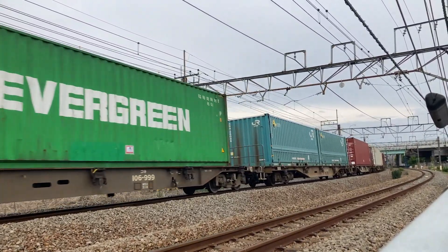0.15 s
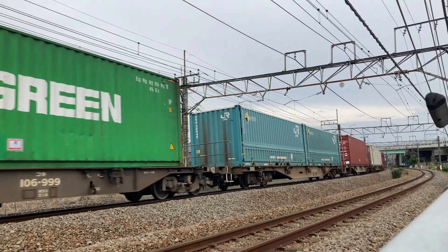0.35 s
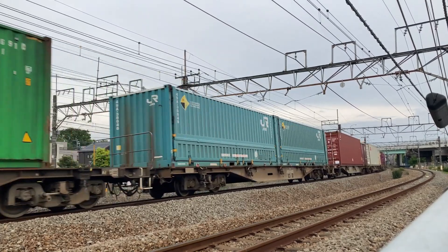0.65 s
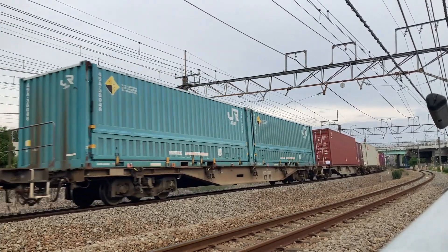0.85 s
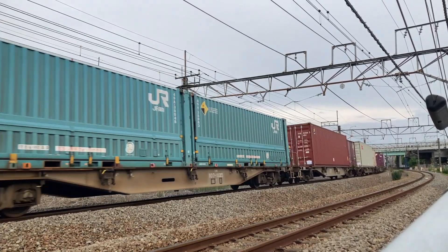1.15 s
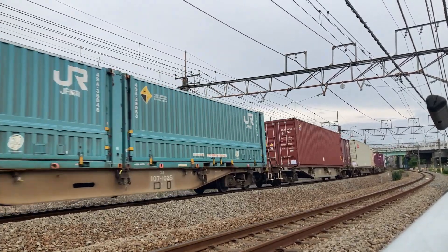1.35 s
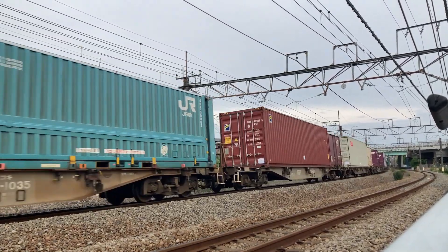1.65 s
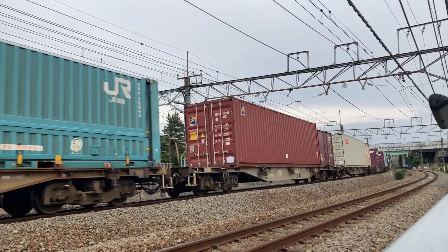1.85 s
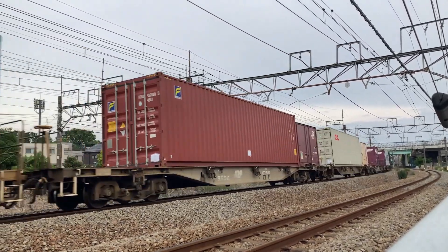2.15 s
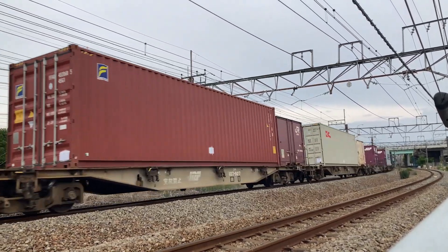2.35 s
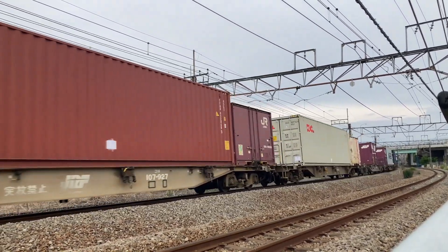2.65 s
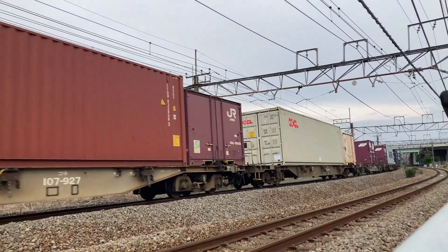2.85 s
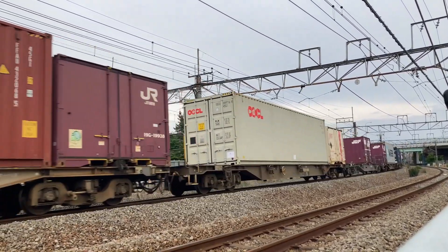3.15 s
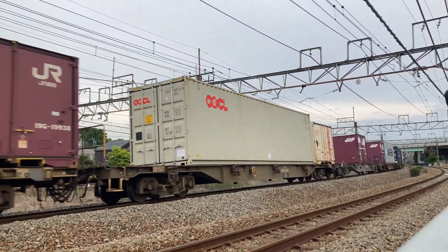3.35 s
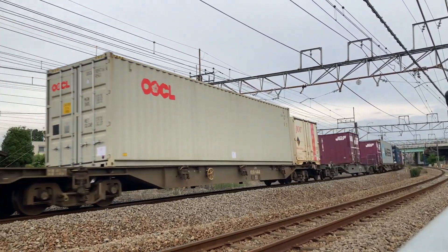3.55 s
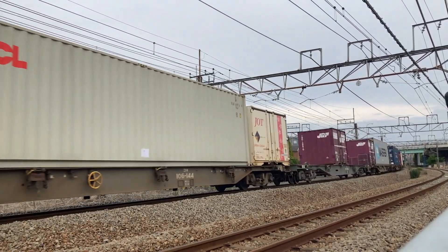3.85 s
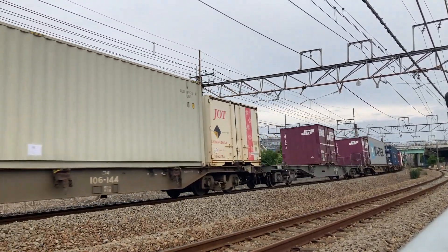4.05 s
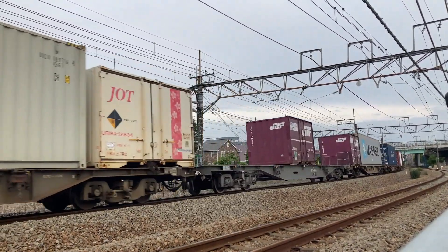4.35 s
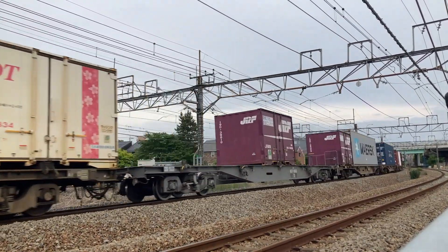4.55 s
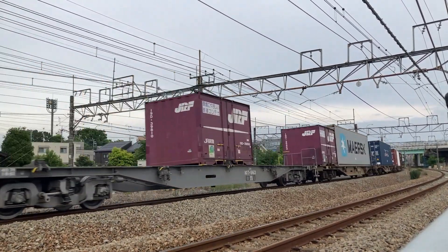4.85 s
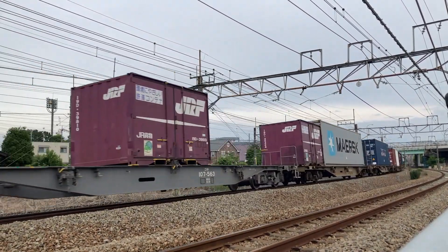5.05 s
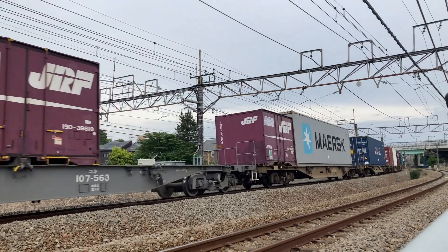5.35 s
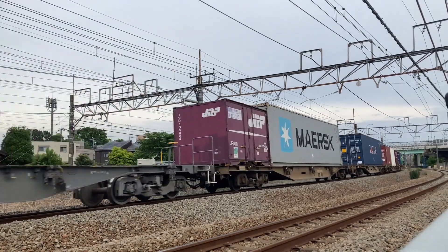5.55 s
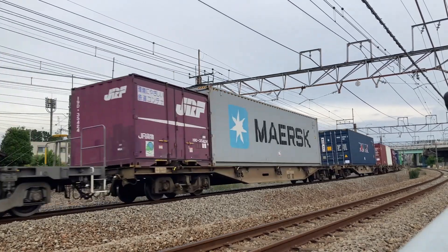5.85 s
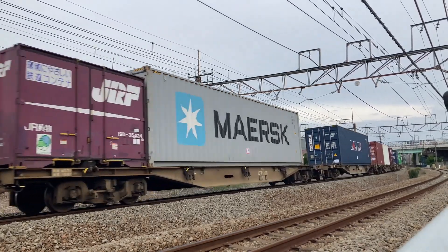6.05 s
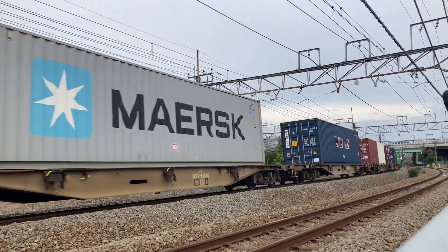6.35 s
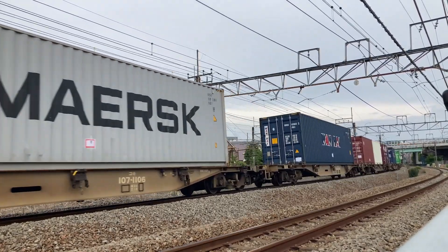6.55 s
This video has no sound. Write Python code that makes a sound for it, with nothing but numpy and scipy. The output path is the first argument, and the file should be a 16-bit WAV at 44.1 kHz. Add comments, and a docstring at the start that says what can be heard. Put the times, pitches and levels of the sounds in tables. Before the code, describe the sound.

A container freight train rolls close by on a curve, wheels hissing and squealing thin and high over paired metallic clacks and a low rumble.

```python
"""Freight train on a curve

Wheel flanges rub the rail: a bright hiss, and wheel modes under stick-slip that squeal and slide down in pitch
as each wheel goes by. Axles clack, mostly in pairs, over a rail joint; rail resonances hum under rough wheels;
the cars rumble and bump as low noise and short swings. Two spaced microphones; both trebles come from the left.
"""
import sys
import numpy as np
from scipy import signal
from scipy.fft import rfft, irfft
from scipy.io import wavfile
from scipy.ndimage import uniform_filter1d

SR = 44100
rng = np.random.default_rng(int(sys.argv[2]) if len(sys.argv) > 2 else 0)


def to_wav(s):
    """Save 16-bit WAV."""
    ch = np.atleast_2d(s).T  # columns
    pcm = np.round(np.clip(ch, -1, 1) * 32767)  # PCM
    wavfile.write(sys.argv[1], SR, pcm.astype(np.int16))


N = 295470
TIME = np.arange(N) / SR
HZ = np.maximum(np.arange(N // 2 + 1) * SR / N, 1)

# squeal bursts, one wheel mode each: [rest pitch f/Hz, wheel nearest t/s, loudest t/s, rise t/s, fall t/s, level/dB]
SQUEAL_BURSTS = [ (6681, 0.84, .02, .05, 0.56, -41), (10308, 0.16, 0.052, 0.077, .07, -37),
                 (11152, 2.5, 0.28, 0.74, .5, -38), (12200, 2, .32, .04, .09, -38),
                 (9098, 1.8, 0.62, 0.22, 0.22, -38), (6320, 0.7, .55, .13, 0.17, -35.5),
                 (8560, 0.8, .62, .2, 0.51, -33.5), (12600, 1.12, .66, .2, .14, -35),
                 (6660, 0.84, .72, .08, 0.15, -32.5), (12400, 0.9, 0.745, .04, 0.081, -24.5),
                 (4600, 0.85, .84, .07, .14, -40), (6900, 3.5, .86, .2, .16, -38.5),
                 (12275, 0.9, .92, .09, .1, -24.5), (4860, 1.02, .95, .35, .3, -41),
                 (5790, 1.26, .96, .03, .12, -34), (4230, .9, .88, .1, .05, -40),
                 (9901, 2.08, 1.1, .15, .5, -41), (9098, 1.32, 1.22, .17, .37, -37),
                 (4916, 1.46, 1.23, .03, .12, -27), (4916, 1.46, 1.34, .1, .11, -32),
                 (6960, 4, 1.3, .1, 0.36, -37), (10800, 1.58, 1.3, .2, 0.39, -37.5),
                 (10970, 2.5, 1.3, 0.66, 0.85, -40.5), (4916, 1.46, 1.56, .1, .1, -42),
                 (4870, 1.6, 1.72, .07, .18, -41), (9080, 2.5, 1.6, 0.15, 0.18, -33.5),
                 (6955, 3.9, 1.97, .1, 0.036, -26.5), (7400, -0.7, 1.97, 0.28, .2, -32.5),
                 (14550, 2.53, 2.15, .4, .2, -31), (5280, 2.5, 2.18, 0.05, 0.04, -35),
                 (14230, 2.15, 2.22, .14, 0.05, -31), (10950, 2.3, 2.25, .2, 0.35, -38),
                 (6947, 3.5, 2.2, .17, 0.28, -41.5), (4865, 2.5, 2.42, 0.4, 0.3, -39),
                 (14550, 2.53, 2.38, 0.07, .06, -27), (13628, 2, 2.55, .04, .1, -33),
                 (14550, 2.53, 2.5, .06, .08, -29), (13483, 2.54, 2.6, 0.17, .12, -34),
                 (14530, 2.53, 2.62, .05, 0.06, -21), (14470, 1.5, 2.4, .08, .12, -31),
                 (13678, 5.3, 3.0, .2, .9, -42), (8860, 6, 4.1, 0.044, 0.14, -33),
                 (2940, 3.5, 3.4, .06, .09, -44), (6160, 3.55, 3.475, .05, 0.13, -28),
                 (6070, 3.55, 3.56, 0.09, 0.05, -30), (7150, 3.5, 3.45, .25, .15, -37),
                 (2940, 3.7, 3.74, .05, .07, -39), (4040, 3.5, 3.42, .05, .08, -41),
                 (4580, 3.9, 3.8, .08, .08, -43), (2640, 3.95, 3.95, .06, .05, -44),
                 (4930, 4, 3.71, .06, 0.05, -36), (8160, 3.5, 3.72, .4, .12, -40),
                 (6947, 3.9, 3.76, .2, 0.12, -36), (3990, 3.7, 3.77, .06, .1, -35),
                 (3930, 3.9, 3.98, .07, .04, -41), (2040, 3.8, 3.78, 0.12, 0.2, -44),
                 (2200, 3.8, 3.74, .1, .15, -46), (2130, 3.9, 3.9, .12, .1, -47),
                 (3930, 3.9, 3.84, .1, .15, -43), (8940, 4.5, 4.4, .065, .12, -36),
                 (3800, 4.5, 4.33, 0.091, 0.09, -40), (9000, 5.5, 4.32, 0.51, 0.76, -40.5),
                 (10950, 4.65, 4.25, 0.4, 0.3, -37), (10950, 4.65, 4.7, .16, .12, -27),
                 (5130, 4.9, 4.54, .08, .16, -37), (5100, 4.6, 4.33, .06, .08, -41),
                 (2590, 4.85, 4.8, .1, .12, -47), (12500, 4.8, 4.7, 0.12, .11, -40),
                 (15379, 4.5, 4.7, .07, .13, -37), (14100, 5.04, 4.7, 0.06, .09, -28),
                 (4030, 4.6, 4.67, .09, .1, -35), (4442, 4.88, 4.63, .06, .06, -33),
                 (4460, 4.88, 4.78, .08, .07, -34), (10500, 5, 4.4, .06, .22, -36),
                 (3840, 5.1, 5.02, .07, .07, -42), (3930, 5.2, 5.2, .15, .35, -42),
                 (3950, 4.8, 4.8, .15, .2, -40), (6800, 6.5, 5.96, .06, .12, -37),
                 (9848, 5, 5.75, .45, 0.23, -34.5), (7070, 6.5, 5.9, .9, 0.5, -38),
                 (9848, 5, 5.98, .07, 0.12, -25), (13038, 8, 6.9, .5, .3, -40),
                 (9848, 4.5, 6.14, .06, .02, -28), (9780, 4.98, 6.2, .42, 0.22, -31),
                 (14318, 5, 6.3, .15, .3, -38), (7130, 6.5, 6.31, 0.16, 0.061, -24),
                 (6380, 6.76, 6.32, .13, .13, -37), (13038, 6.44, 6.34, .12, 0.45, -33),
                 (9710, 5.5, 6.375, .06, .015, -27), (15282, 6.6, 6.4, .2, .17, -34),
                 (14318, 6, 6.42, .03, .055, -19), (14500, 6.4, 6.42, .2, .05, -30),
                 (7150, 6.5, 6.48, 0.14, .08, -28.5), (7795, 3.5, 6.4, 0.2, 0.3, -32),
                 (9710, 5, 6.5, 0.056, .12, -31), (14303, 7.28, 6.62, .17, .2, -36),
                 (7130, 6.5, 6.66, 0.13, .1, -35), (9880, 5, 6.68, .3, .1, -27.5)]
# level of one wheel that sings through its whole passing: [t/s, level/dB]
LONG_SQUEAL_LEVEL = [(1.44, -42), (2.16, -36), (2.46, -33), (2.619, -27.5), (2.76, -28.5), (2.81, -17.5),
                     (2.88, -32), (2.98, -30.5), (3.14, -22), (3.24, -29), (3.32, -27), (3.4, -14.5),
                     (3.46, -31.5), (3.52, -19.5), (3.58, -30), (3.74, -29), (3.92, -39), (4.05, -46)]
# random share of a squeal's grip, by pitch; low modes fray more: [f/Hz, share 0-1]
SQUEAL_ROUGHNESS = [(2000, 1), (4000, 0.2), (5000, 0.2), (11000, 0.5)]
# hiss around a tone, by pitch: [f/Hz, relative level/dB]
SQUEAL_HALO = [(5000, -8), (9000, -5.5)]
# faint squeals, by pitch: [f/Hz, relative level/dB]
FAINT_LEVEL = [(1900, -21), (3000, -13), (4500, -10), (7000, -3), (11000, 1), (15600, -2.5)]
# flange contact: [t/s, hiss level/dB, scrape level/dB]
FLANGE_LEVELS = [(0.0, -24, -45), (0.32, -33, -42.5), (0.5, -26, -39.5), (0.97, -23.5, -38),
                 (1.31, -25.5, -39), (1.57, -34, -36.5), (1.79, -26, -39), (2.39, -28.5, -36.5),
                 (2.67, -27.5, -43), (3.04, -30, -37.5), (3.4, -28.5, -39), (3.86, -24, -35),
                 (4.1, -31.5, -40), (4.58, -24, -32), (5.2, -31.5, -38), (5.67, -29.5, -39.5),
                 (6.05, -22.5, -36.5), (6.34, -25.5, -39), (6.7, -27, -37.5)]
# flange hiss spectrum: [f/Hz, relative density/dB per Hz]
HISS_SPECTRUM = [(4500, -20.5), (6000, -14), (7200, -2), (8200, -12.5), (10000, -1.5), (11500, -2.5),
                 (13000, -6), (14500, -1), (15200, -10.5), (16000, 3)]
# flange scrape spectrum: [f/Hz, relative density/dB per Hz]
SCRAPE_SPECTRUM = [(2400, -39), (3200, -5), (4000, 0), (4500, -1.5), (5500, 2), (6300, -14.5), (7000, -4),
                   (9000, -2)]
# tread grind: [t/s, level/dB]
TREAD_LEVEL = [(0, -47.5), (.8, -48), (1.7, -47.5), (2.4, -46), (3.4, -47), (3.82, -40), (4.02, -46),
               (4.3, -43.5), (5.08, -44.5), (5.4, -48.5), (5.86, -50.5), (6.05, -49), (6.34, -40),
               (6.7, -48)]
# tread grind spectrum: [f/Hz, relative density/dB per Hz]
GRIND_SPECTRUM = [(1100, -28.5), (1650, -13), (1950, 0.5), (2200, -1.5), (2600, -2), (3000, -5.5),
                  (3500, -8.5), (4500, -76)]
# axles over the joint: [t/s, relative level/dB, pitch that rings most f/Hz, relative thud level/dB]
AXLE_CLACKS = [(0.437, -32, 614, 3), (0.553, -34.5, 560, -1), (0.81, -25.5, 510, 1),
               (0.934, -29.5, 760, -0.5), (1.684, -29, 540, -2), (1.81, -33, 950, 10),
               (2.061, -33.5, 616, 0), (2.194, -29.5, 526, 0), (2.944, -30, 553, 0),
               (3.072, -33.5, 524, -9), (3.333, -28, 530, -14), (3.446, -30.5, 590, -18),
               (4.218, -31, 554, 5), (4.334, -35, 630, -2.5), (4.601, -31, 560, 5), (4.729, -34, 656, 7),
               (5.486, -31.5, 690, 6), (5.619, -31.5, 620, -8), (5.832, -35, 500, 3), (5.877, -27, 560, 2),
               (5.976, -31.5, 527, 16), (6.013, -30, 860, 5), (6.128, -31, 850, -8), (6.286, -35, 654, 2),
               (6.432, -33.5, 800, 12), (6.593, -34, 607, 10)]
# joint modes: [f/Hz, relative level/dB, t60/s]
JOINT_MODES = [(102, -10, 0.03), (249.3, -14, 0.06), (335, -14, 0.04), (420.4, -10, 0.1), (505, 2, 0.12),
               (620, 2, 0.035), (760, 0, 0.03), (930, -5, 0.06), (1150, -12, 0.036), (1330, -12, 0.08)]
# rail and sleeper resonances: [f/Hz, -6 dB width f/Hz, relative level/dB]
RAIL_RESONANCES = [(436, 24, 3), (454, 158, -5.5), (877.5, 61, -2), (1325, 27.5, -6), (1760, 650, -17)]
# rolling noise spectrum: [f/Hz, relative density/dB per Hz]
ROLLING_SPECTRUM = [(150, -17.5), (300, -12), (600, -3), (1000, -5.5), (1500, -12.5), (2500, -73)]
# car body rumble: [t/s, level/dB]
CAR_LEVEL = [(0, -40), (.4, -48), (1.0, -44.5), (1.3, -41), (2.0, -44), (2.5, -46.5), (3.5, -44),
             (4.4, -45.5), (5.2, -46.5), (6.05, -43), (6.7, -42)]
# car body rumble spectrum: [f/Hz, relative density/dB per Hz]
RUMBLE_SPECTRUM = [(15, -50), (25, -46), (35, -10), (55, 2.5), (90, -0.5), (150, -6), (250, -10),
                   (320, -16.5), (400, -22)]
# dull car body bumps: [t/s, peak level/dB, f/Hz]
CAR_BUMPS = [(.005, -32.5, 162), (0.113, -32, 121), (.205, -33.5, 111), (.235, -36, 110), (.468, -36, 79.5),
             (0.594, -35, 96), (1.837, -33, 90), (3.225, -35, 94), (5.925, -35, 62), (5.976, -31, 227),
             (6.024, -34, 74.5), (6.1, -32, 85), (6.396, -31.5, 220), (6.59, -29, 197)]
# noise common to both sides: [f/Hz, share 0-1]
STEREO_LIKENESS = [(30, 1), (150, 0.71), (700, 0.74), (1300, 0.82), (3000, 0.49), (6000, 1)]
# left over right: [f/Hz, level/dB]
LEFT_OVER_RIGHT = [(60, -0.5), (500, 3), (1500, 3), (2200, 0), (4000, -1), (5000, 10), (6200, 0.5),
                   (6900, -0.5)]

SPEED_M_S, TRACK_M, SOUND_M_S = 16, 10, 343
MIC_GAP_S, AIM_RAD = 0.000488, 0.95
LOW_LAG_S, CLACK_LAG_S = 0.00024, 0.000057   # rail and joint lie more ahead: less lag between sides
LONG_HZ, LONG_NEAREST_S = 11412, 3.48
BURST_DROP_DB = 12   # lost one rise before and one fall after the top
BURST_ROUNDING = 1.48   # exponent: 1 pointed top, 2 round
HALO_SMOOTH_S = .25   # halo swells more slowly than the tone
STRAND_DB, STRAND_STEPS = 5, 7   # spread of strand levels; smoothing in 23 ms steps
LATER_S = .004   # extra delay per octave below 900 Hz: the rail carries high modes faster
FOCUS_DB = 13   # loss one octave from the pitch that rings most
ROLLING_DB, AXLE_SWELL_DB, AXLE_SWELL_S = -48, 4.0, 0.086   # louder while axles are near
BUMP_CYCLES = 2.8
TREBLE_FROM_HZ, IN_STEP_HZ, TURN_HZ = 5820, 15770, 4390
CUTOFF_HZ = 15750


def squeals():
    """Wheels singing out: one long squeal, and bursts that swell and die by one rule."""
    out = np.zeros((2, N))
    add_squeal(out, LONG_HZ, LONG_NEAREST_S, LONG_SQUEAL_LEVEL,
               rough=0.22, width_hz=30.0, flutter_db=1.5, halo_db=-5.0)
    steps = np.linspace(-1.6, 1.6, 17)
    drop_db = BURST_DROP_DB * np.abs(steps) ** BURST_ROUNDING
    for hz, nearest_s, top_s, rise_s, fall_s, db in SQUEAL_BURSTS:
        s = top_s + steps * np.where(steps < 0, rise_s, fall_s)
        add_squeal(out, hz, nearest_s, np.transpose([s, db - drop_db]), rough=at_hz(SQUEAL_ROUGHNESS, hz),
                   width_hz=49.0, flutter_db=1.83, halo_db=at_hz(SQUEAL_HALO, hz))
    return out


def add_squeal(out, hz, nearest_s, level, rough, width_hz, flutter_db, halo_db):
    """One wheel mode under stick-slip, Doppler-shifted by its motion."""
    s, db = np.transpose(level)
    a, b = max(int((s[0] - .04) * SR), 0), min(int((s[-1] + .07) * SR), N)
    t = np.arange(a, b + 20, 20) / SR   # slow quantities: every 20th sample
    along_m = SPEED_M_S * (t - nearest_s)
    path_s = np.hypot(along_m, TRACK_M) / SOUND_M_S
    delay_s = np.interp(TIME[a:b], t, path_s)   # changing path gives the pitch slide
    lag_s = MIC_GAP_S * np.sin(AIM_RAD + np.arctan2(along_m, TRACK_M))
    envelope_db = np.interp(t, [s[0] - .04, *s, s[-1] + .07], [db[0] - 24, *db, db[-1] - 18])
    grip = np.sqrt(1 - rough) + np.sqrt(rough / 2) * slow_complex(width_hz, len(t))
    if halo_db is not None:   # fast slips spread a band of hiss around the tone
        smooth_db = uniform_filter1d(envelope_db, int(HALO_SMOOTH_S * SR / 20), mode="nearest")
        grip = grip + amp(halo_db + smooth_db - envelope_db) * slow_complex(.022 * hz, len(t))
    flutter = flutter_db * slow(8.0, len(t))
    start_phase = np.exp(2j * np.pi * rng.random())
    left = np.sqrt(2) * grip * amp(envelope_db + flutter) * start_phase
    right = left * np.exp(-2j * np.pi * hz * lag_s)
    tone = np.exp(2j * np.pi * hz * (TIME[a:b] - delay_s))
    out[0, a:b] += np.real(tone * np.interp(TIME[a:b], t, left))
    out[1, a:b] += np.real(tone * np.interp(TIME[a:b], t, right))


def faint_squeals(count):
    """Thin squeals of other wheels at random pitches, before and around their passing."""
    out = np.zeros((2, N))
    for start, pitch, ahead, length, size in rng.random((count, 5)):
        s, hz = start * (N / SR - .1), 1900 + 13700 * pitch ** 1.8
        db = at_hz(FAINT_LEVEL, hz) + 2.5 * size
        span_s = .07 + .2 * length ** 2
        level = [(s, db - 6.0), (s + span_s / 2, db), (s + span_s, db - 6.0)]
        add_squeal(out, hz, s + .9 * ahead - .25, level,
                   rough=1.0, width_hz=15.0, flutter_db=3.5, halo_db=None)
    return out


def rubbing(hiss, scrape):
    """Flange hiss, plus flange scrape and tread grind broken into ringing strands."""
    grind, = in_time(TREAD_LEVEL)
    grind_noise = noise(amp(at_hz(GRIND_SPECTRUM) - 60 * (HZ > 4500)), 1.5, 5, MIC_GAP_S)
    scrape_noise = noise(amp(at_hz(SCRAPE_SPECTRUM) - 60 * (HZ > 9000)), 1.1, 5, MIC_GAP_S)
    hiss_noise = noise(amp(at_hz(HISS_SPECTRUM)), 1.3, 5, MIC_GAP_S)
    return strands(grind * grind_noise + scrape * scrape_noise) + hiss * hiss_noise


def strands(x):
    """Rubbing excites many narrow wheel modes, each ringing up briefly: thin strands in the noise."""
    parts = signal.stft(x, nperseg=2048)[2]
    field = rms_one(uniform_filter1d(rng.standard_normal(parts.shape[1:]), STRAND_STEPS, axis=1))
    return signal.istft(parts * rms_one(amp(STRAND_DB * field)), nperseg=2048)[1][:, :N]


def clacks():
    """Each axle drives the joint's modes with a blow and a short rattle."""
    s, axle_db, pitch_hz, thud_db = np.transpose(AXLE_CLACKS)
    at, out = (s * SR).astype(int), np.zeros(N)
    rattle_s = np.arange(int(.06 * SR)) / SR
    decay = np.exp(-rattle_s / .025)
    for k, (hz, mode_db, t60_s) in enumerate(JOINT_MODES):
        colour_db = thud_db if hz < 300 else -FOCUS_DB * np.log2(hz / pitch_hz) ** 2
        strength = amp(axle_db + mode_db - 4.0 + colour_db + rng.normal(0, 0.5, len(at)))
        later = int(LATER_S * SR * max(np.log2(900 / hz), 0))
        drive = np.zeros(N + len(rattle_s))
        for i, g in zip(at + later, strength):
            drive[i:i + len(rattle_s)] += g * .03 * rng.standard_normal(len(rattle_s)) * decay
            drive[i] += g * 1.5 * (-1) ** k   # blow, sign alternating by mode
        r, w = amp(-60 / (t60_s * SR)), 2 * np.pi * hz / SR
        out += signal.lfilter([0, np.sin(w)], [1, -2 * r * np.cos(w), r * r], drive[:N] + 1e-18)
    return np.array([out, lagged(out)])


def rolling():
    """Rough wheels on the rail: broad noise and rail hum, swelling near axles."""
    near = sum(np.exp(-((TIME[::100] - s) / AXLE_SWELL_S) ** 2) for s, *_ in AXLE_CLACKS)
    swell = np.tanh(np.interp(TIME, TIME[::100], near) / 2)
    rough_rail = noise(amp(at_hz(ROLLING_SPECTRUM) - 60 * (HZ > 2500)), 2.5, 3, LOW_LAG_S)
    return amp(ROLLING_DB + AXLE_SWELL_DB * swell) * (rough_rail + amp(2.0) * rail_hum())


def rail_hum():
    """Rough wheels keep the rail's resonances sounding: noise with resonant peaks."""
    power = sum(amp(db) ** 2 / (1 + (2 * (HZ - hz) / width_hz) ** 2) ** 2
                for hz, width_hz, db in RAIL_RESONANCES)
    return noise(np.sqrt(power), 2.0, 6, LOW_LAG_S)


def car_rumble():
    """Car bodies: low noise with a level that rises and falls."""
    level, = in_time(CAR_LEVEL)
    return level * noise(amp(at_hz(RUMBLE_SPECTRUM) - 60 * (HZ > 400)), 1.5, 3, LOW_LAG_S)


def bumps():
    """Car body bumps: a soft swing of a few cycles each."""
    out = np.zeros(N + SR)
    for s, db, hz in CAR_BUMPS:
        turns = np.arange(int(BUMP_CYCLES / hz * SR)) * hz / SR
        swing = np.sin(2 * np.pi * turns) * np.sin(np.pi * turns / BUMP_CYCLES) ** 2
        out[int(s * SR):int(s * SR) + len(turns)] += amp(db) * swing
    return out[:N]


def noise(gain, patchy_db, count, lag_s):
    """Stereo noise of a given colour, in bands of equal weight that each flicker; rms 1."""
    first, second = rfft(rng.standard_normal((2, N))) * gain
    alike = at_hz(STEREO_LIKENESS)
    common = alike * first * np.exp(-2j * np.pi * HZ * lag_s)
    pair = np.array([first, common + np.sqrt(1 - alike ** 2) * second])
    weight = np.cumsum(gain ** 2 / HZ)
    band = np.minimum(weight / weight[-1] * count, count - 1).astype(int)
    together = drift(7.0)
    out = np.zeros((2, N))
    for k in range(count):
        flicker_db = patchy_db * (0.77 * together + drift(10.2))
        out += irfft(pair * (band == k), N) * amp(flicker_db)
    return rms_one(out)


def slow(rate_hz, size):
    """Slow chance of spread 1 at every 20th sample: noise through a double one-pole low-pass, run in."""
    r = np.exp(-40 * np.pi * rate_hz / SR)
    smooth = signal.lfilter([1], [1, -2 * r, r * r], rng.standard_normal(size + 1000))
    return smooth[1000:] * np.sqrt((1 - r * r) ** 3 / (1 + r * r))


def slow_complex(rate_hz, size):
    """Slow chance in amplitude and phase: two independent parts of spread 1."""
    return slow(rate_hz, size) + 1j * slow(rate_hz, size)


def drift(rate_hz):
    """Slow chance at every sample."""
    return np.interp(np.arange(N) / 20, np.arange(N // 20 + 2), slow(rate_hz, N // 20 + 2))


def lagged(x):
    """Delay for the right side, as a phase slope."""
    return irfft(rfft(x) * np.exp(-2j * np.pi * HZ * CLACK_LAG_S), N)


def in_time(rows):
    """Gains at every sample from a curve's dB columns."""
    s, *columns = np.transpose(rows)
    return [amp(np.interp(TIME, s, c)) for c in columns]


def at_hz(points, hz=HZ):
    """Read a curve on a log-frequency axis."""
    f, value = np.transpose(points)
    return np.interp(np.log(hz), np.log(f), value)


def amp(db):
    """dB to gain."""
    return 10 ** (np.asarray(db) / 20)


def rms_one(x):
    """Scale to rms 1."""
    return x / np.sqrt(np.mean(x ** 2) + 1e-20)


def scene():
    """All sources at the two microphones."""
    hiss, scrape = in_time(FLANGE_LEVELS)
    flange = np.sqrt(scrape ** 2 + hiss ** 2)   # more flange contact, louder faint squeals
    wheels = squeals() + flange * amp(-17.0) * faint_squeals(count=800) + rubbing(hiss, scrape)
    return wheels + clacks() + rolling() + car_rumble() + bumps()


def record(dry):
    """Right treble is the left one with a phase that turns with pitch; the top is cut."""
    left, right = rfft(dry)
    share = 1 / (1 + (TREBLE_FROM_HZ / HZ) ** 16)
    turned = left * np.exp(2j * np.pi * (HZ - IN_STEP_HZ) / TURN_HZ)
    right = share * turned + np.sqrt(1 - share ** 2) * right
    lean = amp(at_hz(LEFT_OVER_RIGHT) / 2)
    both = irfft(np.array([left * lean, right / lean]), N)
    return signal.sosfilt(signal.ellip(14, .5, 70, CUTOFF_HZ, fs=SR, output="sos"), both)


dry = scene()
out = record(dry)
to_wav(out)
```